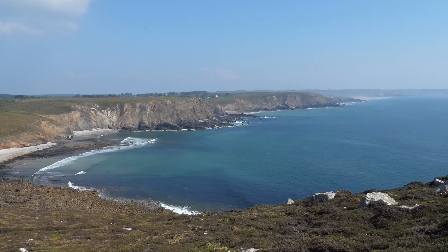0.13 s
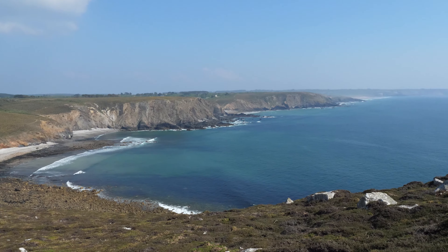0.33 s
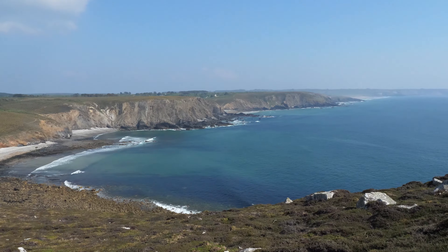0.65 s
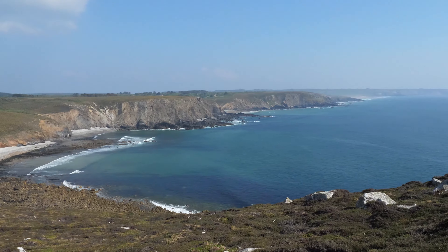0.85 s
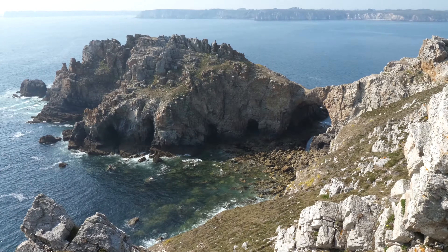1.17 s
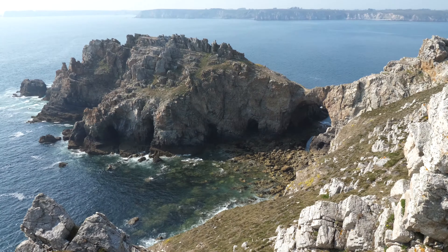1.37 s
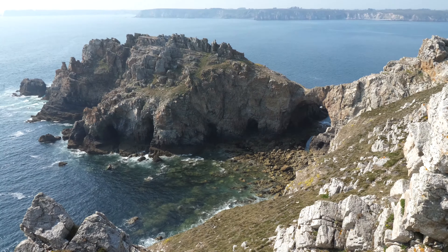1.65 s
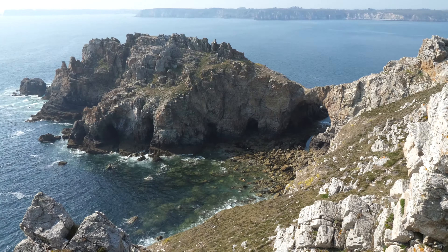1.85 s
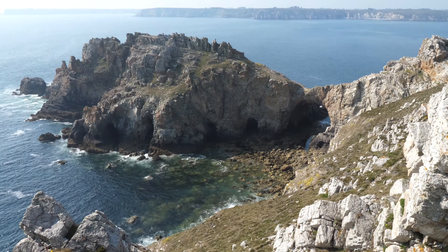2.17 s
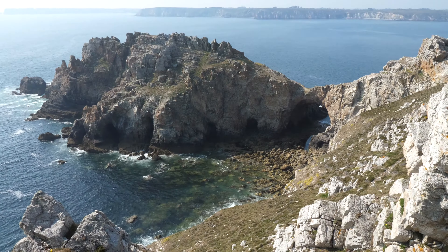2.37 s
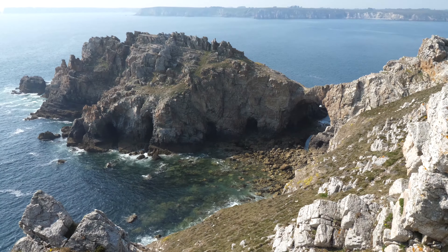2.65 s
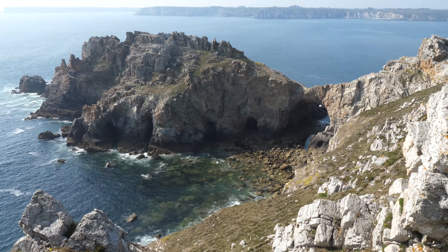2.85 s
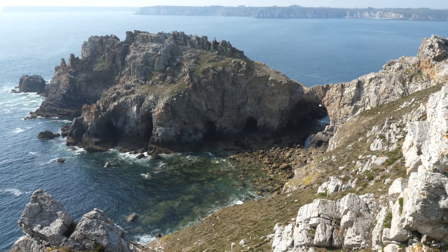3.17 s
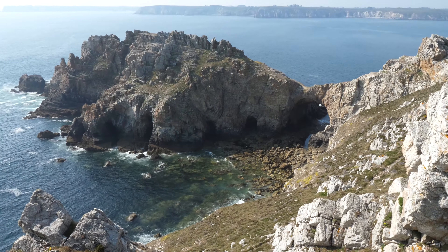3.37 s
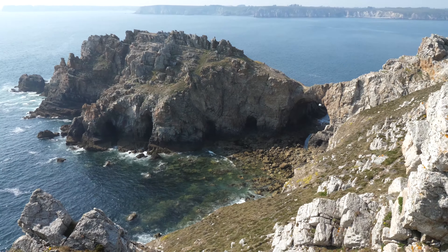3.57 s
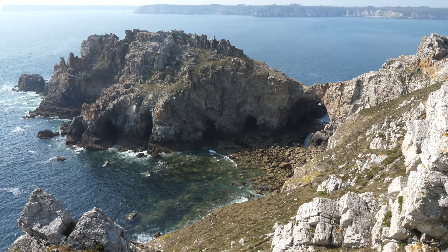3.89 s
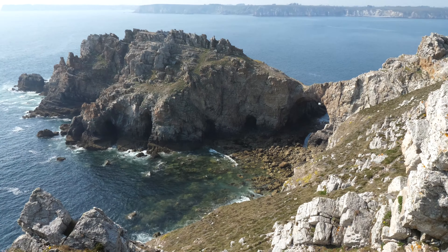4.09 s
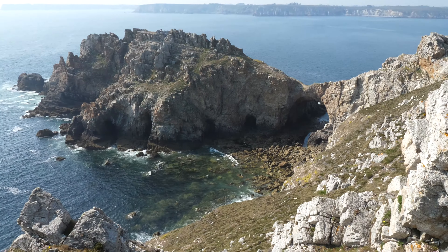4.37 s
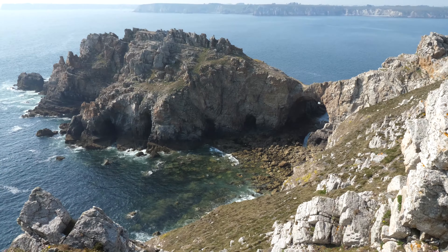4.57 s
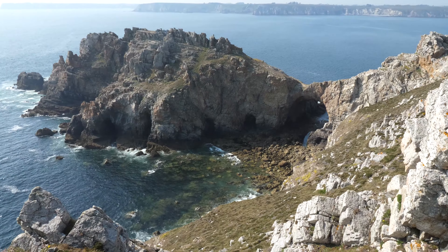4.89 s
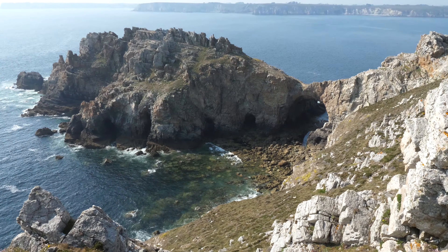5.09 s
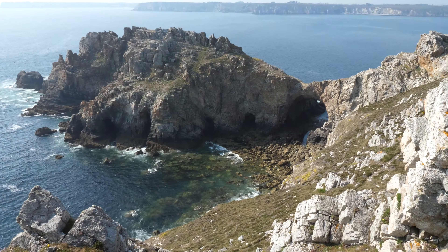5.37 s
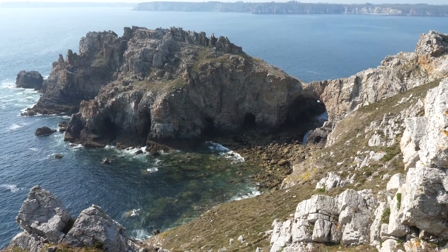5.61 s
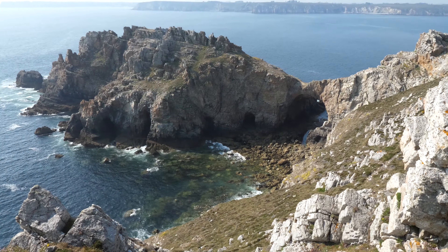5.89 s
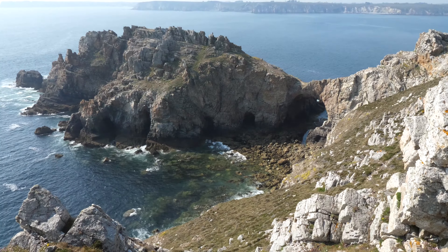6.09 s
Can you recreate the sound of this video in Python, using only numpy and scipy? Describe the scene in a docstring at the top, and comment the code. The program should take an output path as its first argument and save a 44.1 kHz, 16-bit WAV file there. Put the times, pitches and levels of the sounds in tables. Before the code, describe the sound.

Dull distant surf with a small camera click, a short silence, then fuller rocky surf, foam hiss, a thin bird call and wind buffets.

```python
"""Surf from a cliff top, through the two microphone ports of a hand-held camera.
First a far bay: dull, even noise, with a rustle and a wind buffet at once and the camera's click at 0.7 s.
After a short silence comes a rocky cove just below: random noise shaped into roar, splash and foam hiss
on one growing swell. Buffets of low noise open it; from 2 s a small bird repeats a thin two-note call,
made of gliding sines. Near the end the wind buffets again and the surf dips briefly."""
import sys
import numpy as np
from scipy import signal
from scipy.fft import rfft, irfft
from scipy.io import wavfile
from scipy.ndimage import uniform_filter1d

SR = 44100
rng = np.random.default_rng(int(sys.argv[2]) if len(sys.argv) > 2 else 0)


def materialize(psi):
    """Save the field psi as 16-bit PCM at rate SR to the path in sys.argv[1].

    A 1-D psi becomes a single channel; in a 2-D psi each row is a channel.
    """
    bounded = np.clip(np.atleast_2d(psi).T, -1, 1)
    quanta = np.round(bounded * 32767).astype(np.int16)
    wavfile.write(sys.argv[1], SR, quanta)


N = 275625

BAY_END, COVE_START = .9435, 1.2185  # s; silence between them
FRAME, HOP = 1024, 256  # samples in a short-time spectrum, and between two of them
TIME = np.arange(N) / SR  # s, each sample
BINS = np.fft.rfftfreq(FRAME, 1 / SR)  # Hz, each bin of a short-time spectrum
FRAMES = np.arange(N // HOP + 5) * HOP / SR  # s, each short-time spectrum

# Near surf, breakers just below: (frequency [Hz], relative level [dB per Hz])
ROAR_SPECTRUM = [(26, -67), (45, -57), (99, -22.5), (155, -5.5), (377, -0.5), (535, -0.5), (683, -4.5),
                 (841, -2.5), (967, -5), (1170, -2.5), (1880, -12), (2310, -11.5), (2900, -27.5),
                 (3770, -40), (6380, -120)]
# Near surf, hiss of the foam: (frequency [Hz], relative level [dB per Hz])
FOAM_SPECTRUM = [(1600, -27), (2700, -5), (3100, -2), (4100, -0.5), (5200, -7), (6300, -14), (7450, -18),
                 (8150, -16), (9500, -20.5), (11000, -27.5), (13000, -31), (15500, -39)]
# Swell in the cove as it builds: (time [s], level [dB])
COVE_SWELL = [(1.25, -39), (1.48, -36), (5.55, -34)]
# Brief random surges in the roar: (time [s], length [s], roar gain [dB])
SURGES = [(1.56, .05, 2.5), (2.0, 0.099, 4), (2.72, .07, 2.5), (2.95, 0.051, 3.5), (3.16, .08, 2.5),
          (3.8, 0.034, 2), (5.87, 0.083, 2)]
# Sheets of foam that fizz up and drain: (time [s], length [s], foam gain [dB])
FOAM_FIZZES = [(1.7, .4, 2), (5.25, 0.52, 1.3)]
ROAR_DB, SPLASH_DB, FOAM_DB = -2, -3, -13.5  # each layer against the swell
ROAR_FOLLOW, FOAM_FOLLOW = 1, 1.18  # dB for each dB that the swell grows
SURGE_SPLASH = 0.32  # share of a surge's dB gain that the splash takes
ROAR_CHURN_DB, SPLASH_CHURN_DB = .4, .35  # rms of the random heaving
SPRAY_DB, SPRAY_FADE_DB_PER_S = 1.26, 0.56  # extra treble as the cove starts, and its steady thinning


def cove():
    """Surf on the rocks: a low roar, a brighter splash and the hiss of foam, all riding one swell."""
    swell_db = np.interp(TIME, *np.transpose(COVE_SWELL))
    mean_db = swell_db.mean()
    growth_db = swell_db - mean_db
    surges_db = humps(SURGES)
    roar_db = mean_db + ROAR_DB + ROAR_FOLLOW * growth_db + surges_db + ROAR_CHURN_DB * churn()
    splash_db = swell_db + SPLASH_DB + SURGE_SPLASH * surges_db + SPLASH_CHURN_DB * churn()
    foam_db = mean_db + FOAM_DB + FOAM_FOLLOW * growth_db + humps(FOAM_FIZZES)

    # big bubble clouds roar below 800 Hz, smaller ones splash above it
    low_share = 1 / (1 + (BINS / 800) ** 8)
    body_db = read(ROAR_SPECTRUM, BINS)
    low_db = body_db + 10 * np.log10(low_share)
    high_db = body_db + 10 * np.log10(1 - low_share + 1e-12)
    roar = gain_of(roar_db) * water(low_db, patchy_db=1, flicker_db=0.13)
    splash = gain_of(splash_db) * water(high_db, patchy_db=0.61, flicker_db=0.3)

    # the finest spray tilts the treble of the foam
    treble_share = np.interp(BINS, [5000, 7000], [0, 1])
    spray_fade_db = SPRAY_DB - SPRAY_FADE_DB_PER_S * (FRAMES - COVE_START)
    foam_colour_db = read(FOAM_SPECTRUM, BINS) + spray_fade_db[:, None] * treble_share
    foam = gain_of(foam_db) * water(foam_colour_db, patchy_db=0.35, flicker_db=0.3)
    return (roar + splash + foam) * gain_of(surf_dip_db())


def surf_dip_db(start_s=5.706, scale_db=-7, fall_s=.006, recover_s=0.028):
    """The surf dips briefly amid the late buffets; recovery sets in at once, so it stops short of scale_db."""
    since = np.maximum(TIME - start_s, 0)
    return scale_db * np.minimum(since / fall_s, 1) * np.exp(-since / recover_s)


# Far surf, dulled by distance: (frequency [Hz], relative level [dB per Hz])
BAY_SPECTRUM = [(35, -62), (60, -48.5), (93, -22), (229, -9), (355, -4), (399, -5), (762, -6.5),
                (982, -8.5), (1300, -10.5), (1880, -21), (2260, -23.5), (2980, -34.5), (3750, -29),
                (5820, -40.5), (15000, -47.5)]


def bay(level_db=-42):
    """Far breakers: distance has made them dull and even."""
    return gain_of(level_db) * water(read(BAY_SPECTRUM, BINS), patchy_db=0.76, flicker_db=0.6)


# Likeness of the surf at the two ports: (frequency [Hz], likeness [0 to 1])
PORT_LIKENESS = [(60, .99), (130, .999), (290, .996), (640, .97), (1410, .88), (3100, .93), (6000, .95),
                 (8000, .99), (15000, .97)]
# Left port over right port: (frequency [Hz], level difference [dB])
PORT_BALANCE = [(60, 2), (110, -0.9), (200, -1.5), (380, 0.5), (700, 0.5), (1290, 2.0), (2380, 2.1),
                (4400, 0.58), (8120, -1.3), (15000, 0.5)]
# Left port ahead of right port: (frequency [Hz], phase lead [rad])
PORT_LEAD = [(100, -0.035), (400, 0.0029), (700, 0.1), (1100, 0.26), (2000, 0.063), (3450, -0.1),
             (5250, .1), (7000, 0.05)]


def water(colour_db, patchy_db, flicker_db):
    """Countless bubbles and splashes in drifting clumps, as the two ports hear them; rms 1."""
    a, b, c, d = rng.standard_normal((4, len(FRAMES), len(BINS)))
    left, unrelated = a + 1j * b, c + 1j * d
    same = np.clip(read(PORT_LIKENESS, BINS), -1, 1)
    right = same * left + np.sqrt(1 - same ** 2) * unrelated
    right = right * np.exp(-1j * read(PORT_LEAD, BINS))
    lean = gain_of(read(PORT_BALANCE, BINS) / 2)

    clumps_db = patchy_db * patches(size=(16, 12))
    flickers_db = flicker_db * patches(size=(8, 90))  # moves wide bands together
    spectra = np.array([left * lean, right / lean]) * gain_of(colour_db + clumps_db + flickers_db)
    _, sound = signal.istft(spectra.swapaxes(1, 2), nperseg=FRAME, noverlap=FRAME - HOP)
    return evened(sound[:, :N])


def patches(size):
    """A random field, smooth over size = (frames, bins); rms 1."""
    field = rng.standard_normal((len(FRAMES), len(BINS)))
    over_time = uniform_filter1d(field, size[0], axis=0)
    return evened(uniform_filter1d(over_time, size[1], axis=1))


def churn(rate_hz=10):
    """Slow random heaving of the water, strongest at half of rate_hz; rms 1."""
    hz = np.fft.rfftfreq(N, 1 / SR)
    weight = hz / rate_hz * np.exp(-hz / rate_hz * 2)
    return evened(irfft(rfft(rng.standard_normal(N)) * weight, N))


# Small bird, two notes to a call:
# (time [s], starting pitch [Hz], final pitch [Hz], first note level [dB], second note level [dB])
BIRD_CALLS = [(1.996, 5520, 5040, -55, -61), (2.236, 5450, 5030, -56.5, -59),
              (2.57, 5380, 5020, -56.5, -54.5), (2.832, 5330, 4980, -51.5, -52),
              (3.078, 5430, 4990, -54, -54), (3.298, 5850, 5080, -53, -56), (3.534, 5750, 5120, -55.5, -66),
              (3.795, 5300, 5030, -58, -66), (4.128, 5300, 5020, -58, -59)]
FIRST_NOTE_S, SECOND_NOTE_S, NOTE_STEP_S = 0.0455, 0.037, 0.057  # two lengths; start to start
SECOND_DROP_HZ = 110  # fall of the second note


def bird():
    """Each call is a falling note, then a shorter, flatter one that lands on the same pitch."""
    out = np.zeros(N)
    for s, start_hz, end_hz, first_db, second_db in BIRD_CALLS:
        first = note(FIRST_NOTE_S, start_hz, end_hz)
        second = note(SECOND_NOTE_S, end_hz + SECOND_DROP_HZ, end_hz)
        add(out, s, gain_of(first_db) * first)
        add(out, s + NOTE_STEP_S, gain_of(second_db) * second)
    return out


def note(length_s, start_hz, end_hz):
    """A sine that drops steeply and levels out on its final pitch, with soft ends; rms 1."""
    progress = np.linspace(0, 1, int(length_s * SR))
    hz = end_hz + (start_hz - end_hz) * (1 - progress) ** 3
    phase = 2 * np.pi * np.cumsum(hz) / SR
    return evened(np.sin(phase) * signal.windows.tukey(len(progress), .4))


# Wind buffets on the microphone: (time [s], length [s], level [dB])
WIND_BUFFETS = [(.045, 0.028, -47), (1.283, 0.026, -33), (1.325, 0.087, -45), (1.39, 0.038, -44.5),
                (5.395, .035, -49), (5.48, 0.11, -45), (5.715, .05, -36), (5.755, 0.021, -33),
                (5.875, .06, -42), (5.922, .03, -40), (5.97, .04, -47)]
# Colour of a buffet at the microphone: (frequency [Hz], relative level [dB per Hz])
BUFFET_SPECTRUM = [(20, -18), (45, -20), (80, -4.5), (160, 4.5), (230, -7.5), (350, -8.5), (900, -42),
                   (3000, -71)]
# Steady rumble of air at the camera: (frequency [Hz], relative level [dB per Hz])
BREEZE_SPECTRUM = [(30, -36), (65, -21), (90, -1), (125, 3), (200, -9.5), (600, -48)]


def wind(breeze_db=-63):
    """A faint steady rumble of air, and the buffets on top of it."""
    breeze = gain_of(breeze_db) * evened(coloured(rng.standard_normal(N), BREEZE_SPECTRUM))
    return breeze + bursts(WIND_BUFFETS, BUFFET_SPECTRUM, apart_db=-20)


# Camera clicks, in the hand: (time [s], peak level [dB])
CAMERA_CLICKS = [(0.673, -22.5), (.6797, -41.5)]
# Colour of a click at the ports: (frequency [Hz], relative level [dB])
CLICK_SPECTRUM = [(300, -21), (1000, -3), (1700, 5), (2600, 4), (4200, 1), (5500, -3), (7200, 0),
                  (10000, -9.5), (15000, -15)]


def clicks(snap_s=0.00049, ring_s=0.0023, ring_db=-15):
    """A sharp snap of plastic and the very short rattle of the camera case, different at each port."""
    out = np.zeros((2, N))
    t = np.arange(1024) / SR
    decay = np.exp(-t / snap_s) + gain_of(ring_db) * np.exp(-t / ring_s)
    for s, peak_db in CAMERA_CLICKS:
        tick = coloured(port_noise(len(t), apart_db=-3.5), CLICK_SPECTRUM) * decay
        for port, sound in zip(out, tick):
            add(port, s, gain_of(peak_db) * sound / abs(tick).max())
    return out


# Soft rustles: (time [s], length [s], level [dB])
SOFT_RUSTLES = [(.015, 0.025, -51.5), (.632, 0.043, -55), (3.98, 0.07, -48), (5.135, .03, -61)]
# Colour of a rustle: (frequency [Hz], relative level [dB per Hz])
RUSTLE_SPECTRUM = [(900, -20.5), (1700, -3.5), (2150, 0), (2800, -10), (4300, -7.5), (6500, -21),
                   (9000, -22), (11500, -20.5), (13500, -29), (15500, -35)]


def rustles():
    """Soft short swells of noise, brighter than the wind and less alike at the two ports."""
    return bursts(SOFT_RUSTLES, RUSTLE_SPECTRUM, apart_db=-6.0)


# Each port's own noise: (frequency [Hz], relative level [dB per Hz])
HISS_SPECTRUM = [(300, 9.5), (3000, 11), (5500, 12.5), (8000, -8), (12000, 3), (15500, 1)]


def hiss(level_db=-72):
    """Faint self-noise, unrelated between the two ports."""
    return gain_of(level_db) * evened(coloured(rng.standard_normal((2, N)), HISS_SPECTRUM))


def bursts(rows, spectrum, apart_db):
    """Coloured noise that swells and fades once for each row of (time [s], length [s], level [dB])."""
    level = humps([(s, length, gain_of(db)) for s, length, db in rows])
    return level * evened(coloured(port_noise(N, apart_db), spectrum))


def port_noise(count, apart_db):
    """White noise at both ports; apart_db is the part in which they differ."""
    shared, apart = rng.standard_normal((2, count))
    return shared + gain_of(apart_db) * np.array([apart, -apart])


def humps(rows):
    """A curve that rises and falls once, centred on its time, for each row of (time [s], length [s], height)."""
    return sum(height * np.exp(-(2 * (TIME - s) / length) ** 2) for s, length, height in rows)


def coloured(x, spectrum):
    """Filters by a spectrum, without delay."""
    count = x.shape[-1]
    gain = gain_of(read(spectrum, np.fft.rfftfreq(count, 1 / SR)))
    return irfft(rfft(x) * gain, count)


def read(points, hz):
    """Reads a spectrum on a log-frequency axis."""
    f, value = np.transpose(points)
    return np.interp(np.log(hz + 1), np.log(f + 1), value)


def gain_of(db):
    """Decibels to an amplitude factor."""
    return 10 ** (np.asarray(db) / 20)


def evened(x):
    """Scales to rms 1."""
    return x / np.sqrt(np.mean(x ** 2) + 1e-20)


def add(mix, s, sound):
    """Mixes a sound in, starting at time s."""
    part = mix[max(round(s * SR), 0):][:len(sound)]
    part += sound[:len(part)]


def scene():
    """The bay, then the cove, with the bird, the wind and small noises at the camera."""
    in_bay = TIME < (BAY_END + COVE_START) / 2
    surf = np.where(in_bay, bay(), cove())
    return surf + bird() + wind() + clicks() + rustles()


def record(dry, wind_cut_hz=55, edge_hz=15500):
    """The wind filter thins the bass, the ports hiss, the camera is silent between shots; then the band limit."""
    wind_filter = signal.butter(2, wind_cut_hz, "high", fs=SR, output="sos")
    heard = signal.sosfilt(wind_filter, dry) + hiss()
    running = (TIME < BAY_END) | (TIME > COVE_START)
    band_limit = signal.firwin(401, edge_hz, window=("kaiser", 9), fs=SR)
    return signal.oaconvolve(heard * running, band_limit[None], "same")


dry = scene()
out = record(dry)
materialize(out)
```